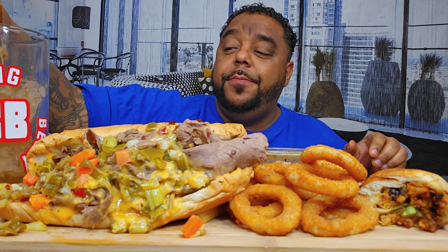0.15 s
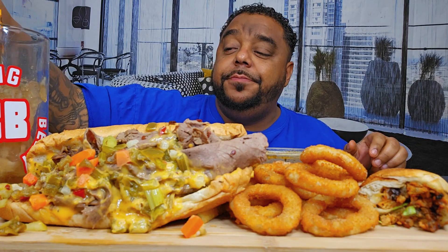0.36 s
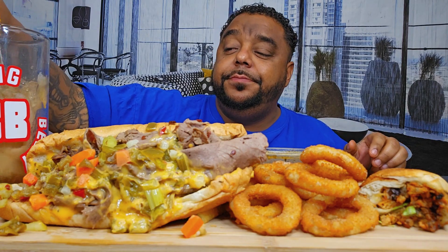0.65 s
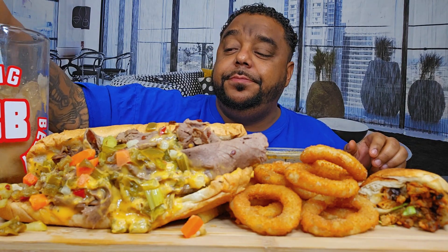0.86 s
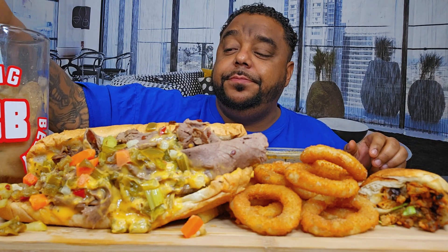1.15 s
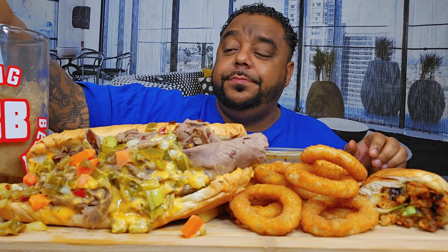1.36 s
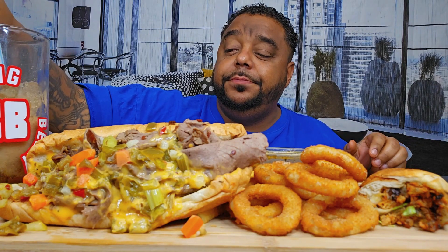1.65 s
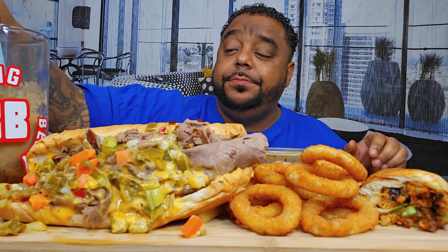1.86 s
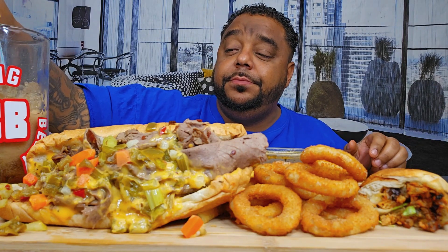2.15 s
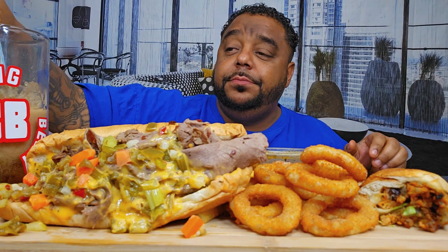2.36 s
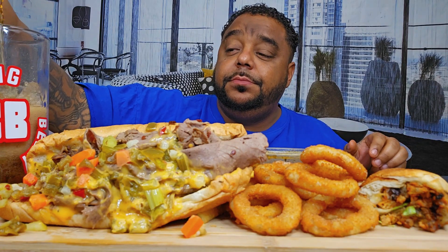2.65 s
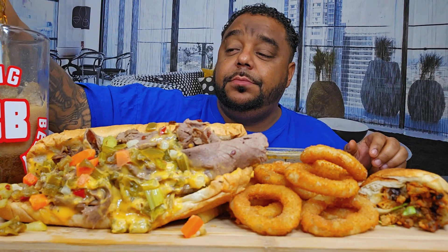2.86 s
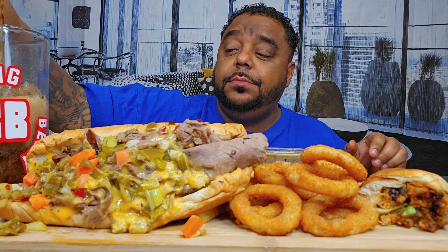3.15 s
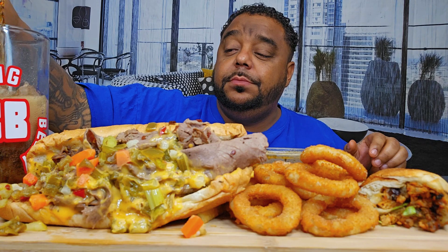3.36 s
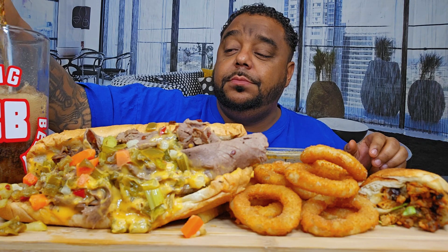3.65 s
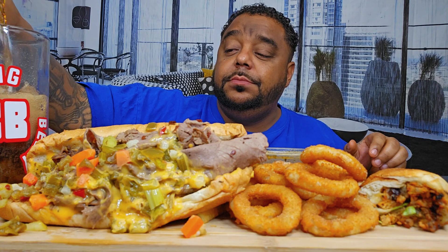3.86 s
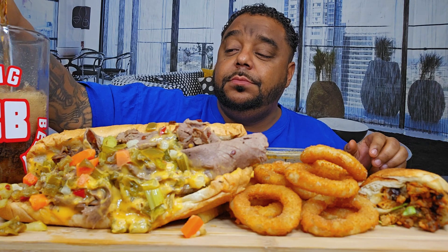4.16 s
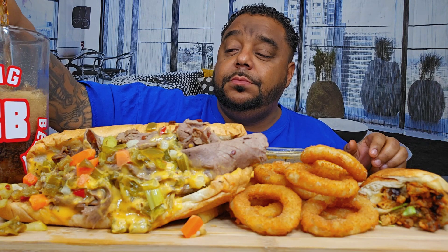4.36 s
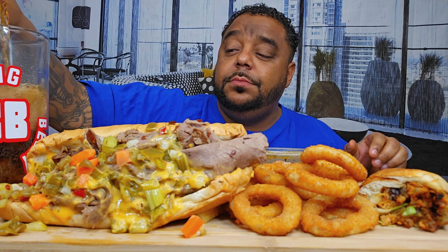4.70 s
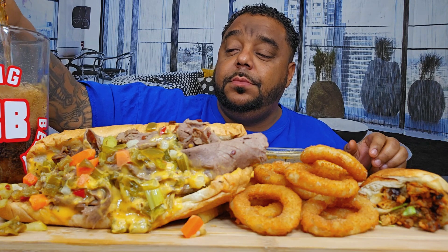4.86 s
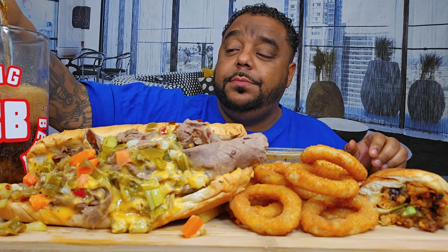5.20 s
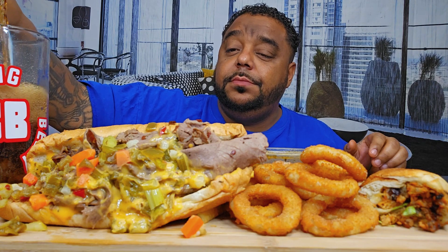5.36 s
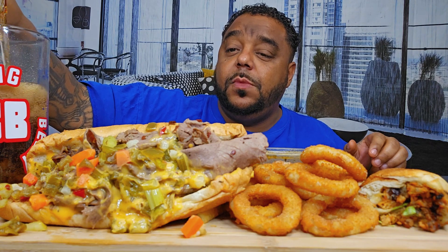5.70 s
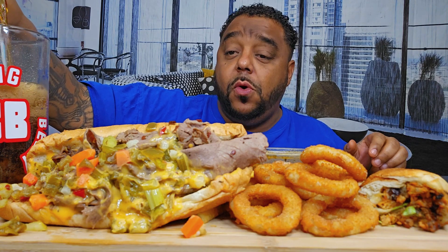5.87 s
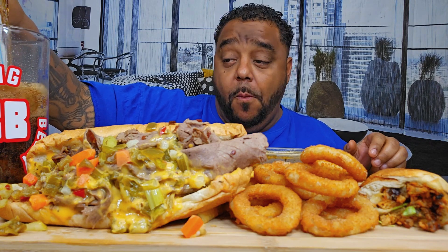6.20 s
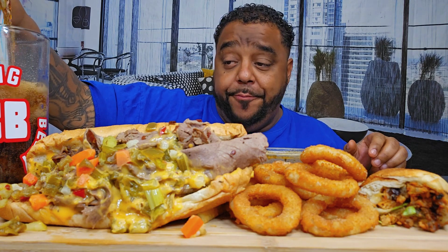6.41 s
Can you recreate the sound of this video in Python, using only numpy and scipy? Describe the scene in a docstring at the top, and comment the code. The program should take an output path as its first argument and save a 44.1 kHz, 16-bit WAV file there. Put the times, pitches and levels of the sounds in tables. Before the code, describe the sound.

Fizzy soda pours steadily into a tall glass of ice, bubbling and hissing, with a glass knock and a few sharp ice cracks.

```python
"""Fizzy soda runs from a can into a tall glass of ice, close to one microphone in a quiet room.
From the start, over an appliance's hum, countless bubbles sound through the air column above the
drink; the foam hisses, single bubbles pop and cubes bump. The column's resonances climb as the foam
rises. At three seconds the glass knocks and slides on its board; then the ice cracks as the pour runs on."""
import sys
import numpy as np
from scipy import signal
from scipy.fft import rfft, irfft
from scipy.io import wavfile

SR = 44100
rng = np.random.default_rng(int(sys.argv[2]) if len(sys.argv) > 2 else 0)


def to_wav(sig):
    """Store sig (one row per channel, or 1-D mono) as 16-bit WAV at the path in sys.argv[1].

    Samples outside -1..1 are clipped; the rate is SR.
    """
    pcm = np.clip(np.atleast_2d(sig), -1, 1) * 32767
    pcm = np.round(pcm).astype(np.int16)
    wavfile.write(sys.argv[1], SR, pcm.T)  # frames by channels


N = 288414
TIME = np.arange(N) / SR
EDGE_HZ = 15850  # top of the microphone's band

# course of the pour: t/s, churning level/dB, small-bubble level/dB, hiss level/dB
POUR = [(0.0, -50.5, -44, -39), (0.38, -44.5, -41, -40), (0.73, -48.5, -43.5, -39.5),
        (1.62, -48.5, -39.5, -38), (2.51, -48.5, -41.5, -39), (3.01, -45, -41.5, -39),
        (3.13, -46.5, -42, -38.5), (3.84, -47, -39, -39.5), (4.68, -45.5, -45, -39.5),
        (5.04, -46, -43.5, -39.5), (6.03, -44, -43.5, -39), (6.54, -45.5, -44, -39.5)]
# how eagerly the foam bursts: t/s, crackle level/dB, treble tilt of the hiss/(dB per octave)
LIVELINESS = [(0, -51.5, -4), (.8, -51, -1), (1.7, -46, -3), (2.5, -58, -4), (3.7, -44, -2), (4.7, -44, -1),
              (5.1, -49.5, -0.5), (5.8, -48.5, 0), (6.54, -52, -2)]
# spectrum of the glass on its board: f/Hz, level/dB
BOARD = [(50, -32), (120, 6), (220, 2.5), (400, -3.5), (650, 3), (950, 8), (1400, -5.5), (2400, -12.5),
         (4000, -17), (9000, -29)]


def amp(db):
    """Decibels to gain."""
    return 10 ** (np.asarray(db) / 20)


def unit_rms(x):
    """Scales x to an rms of 1."""
    return x / np.sqrt(np.mean(x ** 2) + 1e-20)


def follow(rows, t):
    """The columns of a curve table at the times t."""
    times, *columns = np.transpose(rows)
    return [np.interp(t, times, column) for column in columns]


def gain_at(spectrum, hz):
    """Gain of a spectrum table at the frequencies hz."""
    f, db = np.transpose(spectrum)
    return amp(np.interp(np.log(hz + 1), np.log(f + 1), db))


def coloured(x, spectrum):
    """Filters x by a spectrum table and scales it to an rms of 1."""
    return unit_rms(irfft(rfft(x) * gain_at(spectrum, np.fft.rfftfreq(len(x), 1 / SR)), len(x)))


def drift(rate_hz):
    """A slow random wander with an rms of 1."""
    lowpass = np.exp(-(np.fft.rfftfreq(N, 1 / SR) / rate_hz) ** 2)
    return unit_rms(irfft(rfft(rng.standard_normal(N)) * lowpass, N))


def add(mix, s, sound):
    """Mixes a sound in at s seconds."""
    part = mix[max(round(s * SR), 0):][:len(sound)]
    part += sound[:len(part)]


def ping(hz, swell_s):
    """A few cycles that swell and die away."""
    t = np.arange(SR // 40) / SR
    age = t / max(swell_s, 1 / SR)
    return age * np.exp(1 - age) * np.sin(2 * np.pi * hz * t)


def bursts(per_s, spread_db):
    """Clicks at random moments: many small, a few large."""
    size = amp(spread_db * np.minimum(rng.exponential(1, N), 4))
    return size * rng.choice([-1, 1], N) * (rng.random(N) < per_s / SR)


def room_tone(air_db=-55.0):
    """An appliance's wavering motor lines over the low murmur of the room's air."""
    # spectrum of the air: f/Hz, level/dB
    air = [(12, -32), (25, -12), (34, -6), (52, 4), (75, -1), (100, -0.5), (160, -7), (215, 0), (340, -17),
           (480, -30), (900, -10), (4000, -34)]
    # motor lines: f/Hz, level/dB, waver (0-1), start of the fade-in t/s
    hum = [(58.5, -55.5, 0, 0.5), (71.9, -56.5, 0, 2.5), (119.7, -62, 0.27, 0), (226, -64, 0.4, 2.5),
           (238.5, -60.5, 0.14, -3.5), (258.4, -55, 0.08, -0.5), (302, -67.5, 0.7, -0.5)]
    out = amp(air_db) * coloured(rng.standard_normal(N), air)
    for hz, db, waver, start in hum:
        envelope = unit_rms(abs(1 + waver * drift(rate_hz=7.6))) * np.clip(2 * (TIME - start), 0, 1)
        phase = 2 * np.pi * (hz * TIME + rng.random()) + waver * drift(rate_hz=1.3)
        out += amp(db) * np.sqrt(2) * envelope * np.sin(phase)
    return out


def air_column(x, mode, skirt_octaves=0.53):
    """Passes x through one climbing resonance of the air in the glass, ever more damped by the foam."""
    # resonances above the drink: t/s, first f/Hz, second f/Hz, third f/Hz
    resonances = [(0, 626, 1190, 2800), (.3, 674, 1440, 2940), (1.1, 782, 1900, 3060),
                  (1.7, 914, 2060, 3060), (2.6, 930, 2320, 3000), (3.7, 970, 2570, 3620),
                  (5.2, 1003, 2470, 4100), (6.54, 1050, 2420, 4000)]
    # per resonance: half width in the bare glass/Hz, widening/(Hz per s), level/dB, change/(dB per s)
    damping = [(24, 30.4, -1.5, 0.41), (282, 73, -1.5, 0.27), (380, 43, -1.5, -0.8)]
    hz, t, spectra = signal.stft(x, SR, nperseg=1024, noverlap=768)
    centre = follow(resonances, t)[mode]
    bare, widening, db, db_per_s = damping[mode]
    octaves = np.log2((hz[:, None] + 1) / centre)
    gain = 1 / (1 + 2j * (hz[:, None] - centre) / (bare + widening * t))
    gain /= 1 + (octaves / skirt_octaves) ** 4  # little escapes far from the resonance
    gain /= np.sqrt(np.mean(abs(gain) ** 2, axis=0))  # same power at any width
    return signal.istft(spectra * gain * amp(db + db_per_s * t), SR, nperseg=1024, noverlap=768)[1][:N]


def stream(churn_db=0.5, bubbles_db=-5.0, gurgle_db=-23.5, flutter_db=1.0):
    """The stream drags air under; the bubbles excite the column in uneven gushes."""
    # glugs of the can, which swell the low gurgle: middle t/s, half length/s, rise/dB
    glugs = [(1.005, 0.11, 10), (1.547, 0.12, 11.5), (1.86, .08, 10), (6.303, 0.32, 10)]
    # spectrum of the gurgle: f/Hz, level/dB
    gurgle_tone = [(150, -36), (340, -5), (445, 0.5), (540, -3), (700, -4), (1500, -23), (4000, -60)]
    churn, bubbles, _ = follow(POUR, TIME)
    gushes = unit_rms(bursts(per_s=4000, spread_db=3.5)) * amp(flutter_db * drift(rate_hz=8.7))
    glug_db = sum(db * np.exp(-((TIME - s) / half) ** 4) for s, half, db in glugs)
    gurgle = amp(churn + gurgle_db + glug_db) * coloured(gushes, gurgle_tone)
    low = amp(churn + churn_db) * air_column(gushes, 0)
    high = amp(bubbles + bubbles_db) * (air_column(gushes, 1) + air_column(gushes, 2))
    return gurgle + low + high


def foam_hiss(hiss_db=0.64, flutter_db=0.76, sink_s=0.74, build_s=2.8, body_hz=4300):
    """The head hisses with thousands of tiny bursts: high and thin at first, fuller as it builds."""
    # spectrum of the hiss: f/Hz, level/dB
    hiss_tone = [(450, -20.5), (800, -7), (1250, -3.5), (2700, -1), (4600, -4), (5500, -2), (6400, -2.4),
                 (7600, -1.44), (9400, -6.5), (10400, -5), (11700, -6.5), (12500, -11), (14500, -8.5),
                 (16000, -9.5)]
    hz, t, spectra = signal.stft(bursts(per_s=16000, spread_db=2.5), SR, nperseg=256)
    hz = hz[:, None]
    tilt_db = follow(LIVELINESS, t)[1] * np.maximum(np.log2((hz + 1) / 6000), 0)
    peak_hz = 6270 + 2100 * np.exp(-t / sink_s)  # the peak sinks while the head builds
    peak_db = 3.5 / (1 + ((hz - peak_hz) / 670) ** 2)
    thin_db = -3 * np.exp(-t / build_s) * (hz < body_hz)  # and the lower part fills in
    fizz = signal.istft(spectra * amp(tilt_db + peak_db + thin_db), SR, nperseg=256)[1][:N]
    level_db = follow(POUR, TIME)[2] + hiss_db + flutter_db * drift(rate_hz=41)
    return coloured(fizz, hiss_tone) * amp(level_db)


def foam_crackle(sizes=24, swell_cycles=2.1, level_db=-5.0, echo=0.6):
    """Larger foam cells burst one by one: a sharp tick, and its reflection off the glass wall."""
    out = np.zeros(N)
    for hz, delay_s in zip(np.geomspace(6200, 15500, sizes), rng.uniform(0.0003, 0.00098, sizes)):
        tick = ping(hz, swell_cycles / hz)
        tick = tick + echo * np.roll(tick, round(delay_s * SR))
        out += signal.oaconvolve(bursts(per_s=13, spread_db=8.5), tick)[:N]
    return unit_rms(out) * amp(follow(LIVELINESS, TIME)[0] + level_db)


def ruptures(rows, tone_db, snap_db, spread_octaves, fade_s=0.0014):
    """A film tears or ice splits: a damped tone and a brief snap of noise around its pitch."""
    # spectrum of the snap: f/Hz, level/dB
    snap_tone = [(400, -16), (1000, 13), (4000, 0.5), (6500, -1), (11500, -3), (15000, -10)]
    out, t = np.zeros(N), np.arange(SR // 100) / SR
    f = np.fft.rfftfreq(len(t), 1 / SR)
    for (s, db, hz, swell_s), noise in zip(rows, rng.standard_normal((len(rows), len(t)))):
        colour = gain_at(snap_tone, f) / (1 + (np.log2((f + 1) / hz) / spread_octaves) ** 2)
        snap = unit_rms(irfft(rfft(noise) * colour, len(t))) * np.exp(-t / fade_s)
        add(out, s, amp(db + tone_db) * ping(hz, swell_s))
        add(out, s, amp(db + snap_db) * snap)
    return out


def bubble_pops(swell_at_1khz_s=0.0011):
    """Single bubbles burst; the smaller, the higher and shorter."""
    # the loudest bubbles: t/s, level/dB, f/Hz
    pops = [(.0085, -23.5, 1930), (0.0416, -26, 11650), (0.048, -30.5, 4900), (0.1153, -35, 1110),
            (0.1674, -23.5, 1200), (.1973, -30, 5030), (.205, -28, 1960), (.2159, -25.5, 1120),
            (.231, -25, 6200), (.2462, -29, 5300), (0.2775, -23, 4850), (.2915, -33, 675),
            (.4711, -26.5, 6670), (.584, -24.5, 5800), (0.6127, -24.5, 5530), (.8439, -27, 10750),
            (.876, -27, 5330), (.956, -32, 2250), (1.1937, -24, 4730), (1.523, -29, 930),
            (1.6342, -27, 11400), (1.8389, -28, 10800), (2.0615, -29, 2300), (2.1605, -28.5, 10500),
            (3.0676, -21.5, 5600), (3.7509, -23.5, 6860), (3.91, -23, 6540), (4.0852, -22, 6240),
            (4.3316, -26, 6480), (4.3883, -29, 2570), (4.4395, -22, 6400), (4.514, -30, 1930),
            (4.5229, -24, 6550), (4.5943, -24, 1030), (4.6474, -25.5, 6790), (4.658, -28.5, 1150),
            (4.7188, -26, 8700), (4.8419, -24, 7300), (4.844, -29, 13240), (5.3732, -26, 6600),
            (5.6244, -28.5, 1770), (6.005, -32, 1480), (6.2725, -28, 1250), (6.3674, -27.5, 1000)]
    rows = [(s, db, hz, swell_at_1khz_s * (1000 / hz) ** 0.42) for s, db, hz in pops]
    return ruptures(rows, tone_db=0.5, snap_db=-6.0, spread_octaves=0.76, fade_s=0.0027)


def bubble_ticks(full_crackle_db=-45, scatter_db=2.0, tries=300):
    """Small bubbles tick dryly at random moments, more often while the foam is lively."""
    # bubble sizes: f/Hz, spread/octaves, swell/s, rate at full crackle/(1/s), level/dB
    sizes = [(6380, 0.063, 0.00053, 6, -30.5), (11560, 0.07, 0.00014, 28, -30.5)]
    rows, duration = [], N / SR
    for hz, octaves, swell_s, per_s, db in sizes:
        chances, scatter = rng.random((tries, 2)), rng.standard_normal((tries, 2))
        for (when, luck), (detune, strength) in zip(chances, scatter):
            s = when * duration
            lively = amp(follow(LIVELINESS, s)[0] - full_crackle_db) ** 1.6
            if luck * tries < per_s * duration * lively:
                rows.append((s, db + scatter_db * strength, hz * 2 ** (octaves * detune), swell_s))
    return ruptures(rows, tone_db=0.0, snap_db=-2.0, spread_octaves=1.0)


def ice_bumps(thud_db=-6.5, hollow_db=-4.0, t60=0.11):
    """Floating cubes bump the wall: a dull thud and a hollow answer from the air column."""
    # bumps of the cubes: t/s, level/dB
    bumps = [(.215, -34), (.292, -35.5), (.975, -41.5), (1.522, -48), (1.83, -44), (2.06, -35),
             (4.513, -38), (4.593, -45), (4.658, -46), (6.067, -39.5), (6.365, -39)]
    blows, t = np.zeros(N), np.arange(SR // 8) / SR
    for (s, db), noise in zip(bumps, rng.standard_normal((len(bumps), len(t)))):
        add(blows, s, amp(db - 60 * t / t60) * noise)
    thud = coloured(blows, BOARD) * blows.std()
    return amp(thud_db) * thud + amp(hollow_db) * air_column(blows, 0)


def glass_slides(attack_s=0.0074, t60=0.26):
    """The base judders across the board in tiny slips; each shove starts quickly, holds and dies away."""
    # shoves of the base: start t/s, length/s, level/dB
    shoves = [(3.061, 0.079, -34), (3.174, 0.014, -38), (3.203, 0.081, -37)]
    envelope = np.zeros(N)
    for start, length, db in shoves:
        t = TIME - start
        envelope += np.clip(t / attack_s, 0, 1) * amp(db - 60 * np.maximum(t - length, 0) / t60)
    return envelope * coloured(bursts(per_s=1000, spread_db=0.0), BOARD)


def glass_knocks(thud_t60=0.028):
    """The glass knocks on the board with a thud, and its wall rings."""
    # knocks: t/s, thud level/dB, ring level/dB
    knocks = [(3.0675, -30, -38), (3.0985, -20.5, -24.5), (3.129, -34, -35), (3.212, -36, -58)]
    # modes of the glass: f/Hz, level/dB, t60/s
    modes = [(920, -27, 0.26), (2263, 2, 0.12), (2350, 2, 0.049), (2903, -8, 0.11), (4807, -18, 0.091),
             (6300, -2.5, 0.048)]
    out, t = np.zeros(N), np.arange(SR // 2) / SR
    ring = sum(amp(db - 60 * t / t60) * np.sin(2 * np.pi * hz * t) for hz, db, t60 in modes)
    for s, thud_db, ring_db in knocks:
        thud = 0.16 * coloured(rng.standard_normal(len(t)), BOARD) * amp(-60 * t / thud_t60)
        add(out, s, amp(thud_db) * thud + amp(ring_db) * ring)
        add(out, s, amp(thud_db) * ping(hz=920, swell_s=0.0019))  # the blow also shakes the air column
    return out


def ice_cracks(overtone_ratio=2.8, overtone_db=-11.5):
    """Cubes split as the drink warms them; large, low pieces also ring in their second bending mode."""
    # cracks: t/s, level/dB, f/Hz, swell/s
    cracks = [(3.3597, -13.5, 7070, .00027), (3.9439, -14, 10450, .00023), (3.9439, -19, 7950, 0.00021),
              (3.9454, -25, 5040, 0.00051), (3.9451, -19, 6370, .00075), (3.9454, -14.5, 7400, 0.00027),
              (5.8554, -13.5, 2670, 0.00087), (5.8594, -17.5, 2550, .00064)]
    overtones = [(s, db + overtone_db, hz * overtone_ratio, swell_s / 2)
                 for s, db, hz, swell_s in cracks if hz * overtone_ratio < EDGE_HZ]
    return ruptures(cracks + overtones, tone_db=4.0, snap_db=-12.0, spread_octaves=1.3)


def room(x, wet_db=-12.0, t60=0.33, echoes_per_s=3000):
    """The close sound plus faint, quickly fading reflections from the table and walls."""
    t = np.arange(SR // 3) / SR
    taps = rng.choice([-1, 1], len(t)) * (rng.random(len(t)) < echoes_per_s / SR)
    taps = taps * (t > 0.002) * amp(-60 * t / t60)
    return x + amp(wet_db) * signal.oaconvolve(x, taps / np.linalg.norm(taps))[:N]


def scene():
    """Bubbles, ice and glass close up in a small room, over the room tone; both channels alike."""
    floor = room_tone()
    solids = ice_bumps() + glass_knocks() + glass_slides() + ice_cracks()
    bubbles = stream() + foam_hiss() + foam_crackle() + bubble_pops() + bubble_ticks()
    return np.tile(room(bubbles + solids) + floor, (2, 1))


def record(dry):
    """One microphone on both channels, band limited."""
    lowpass = signal.firwin(511, EDGE_HZ, window=("kaiser", 8), fs=SR)
    return signal.oaconvolve(dry, lowpass[None], "same")


dry = scene()
out = record(dry)
to_wav(out)
```